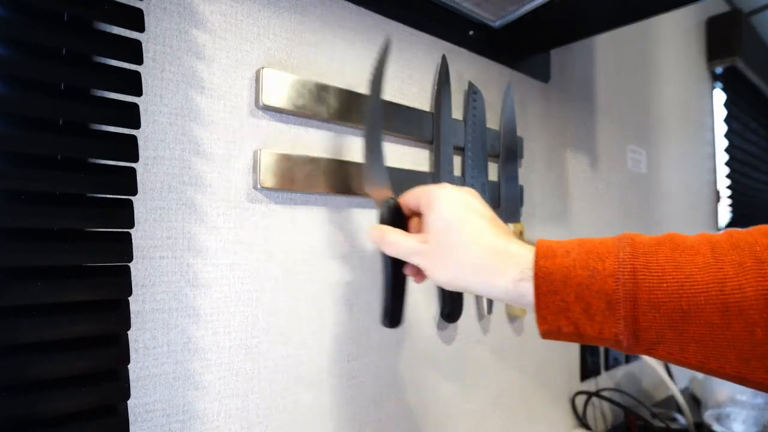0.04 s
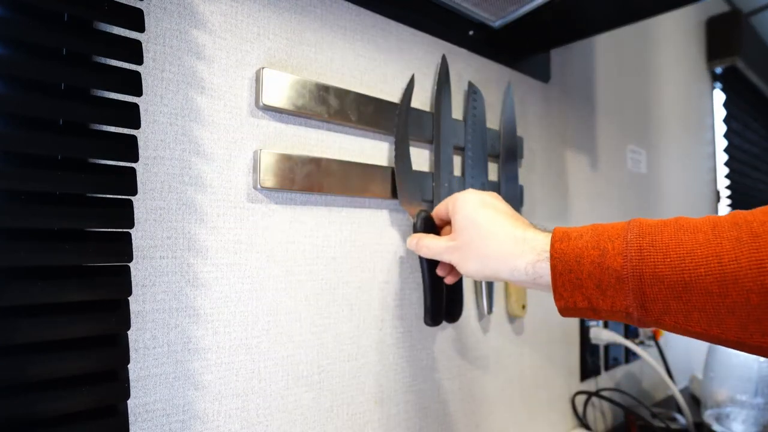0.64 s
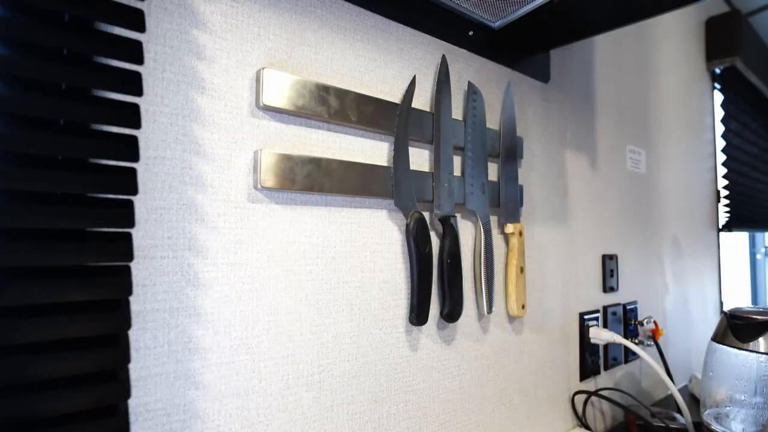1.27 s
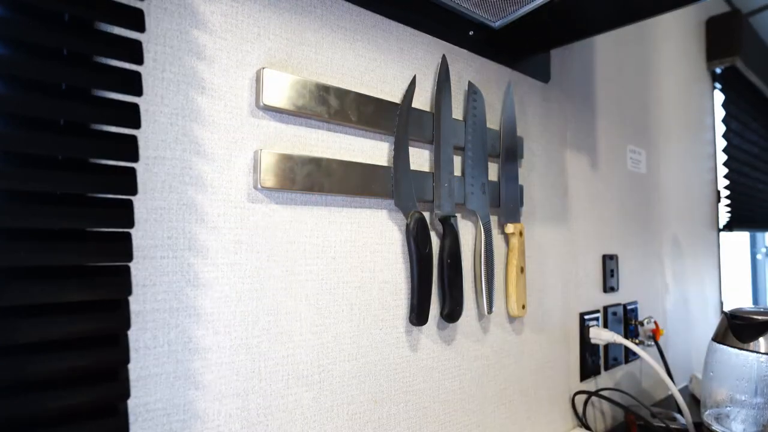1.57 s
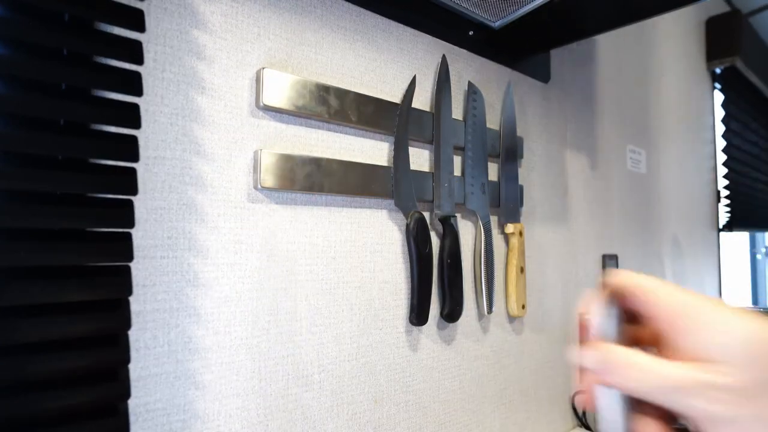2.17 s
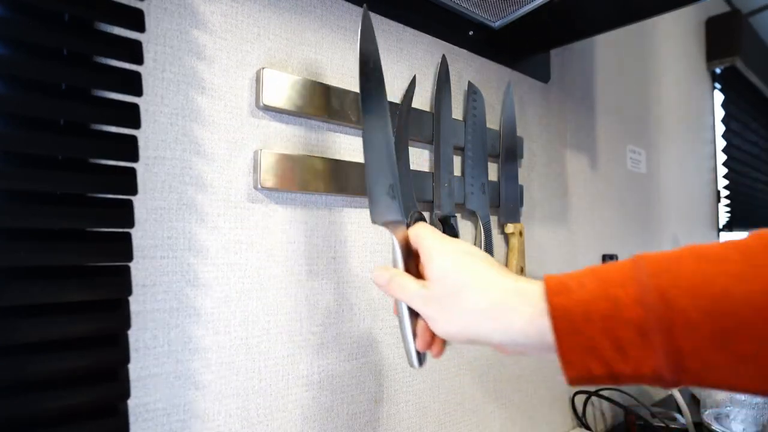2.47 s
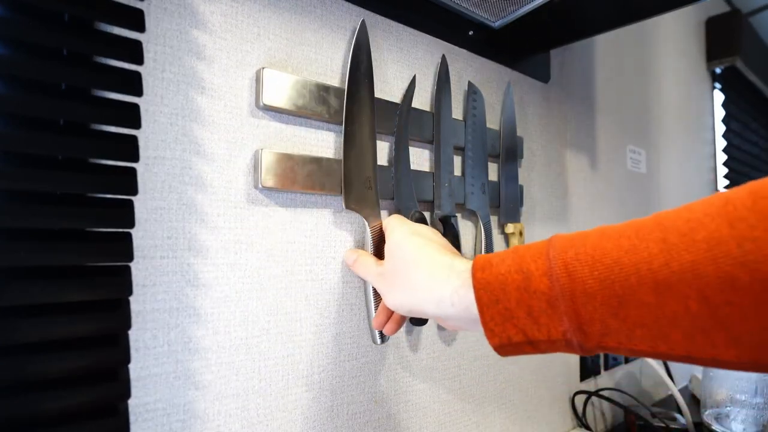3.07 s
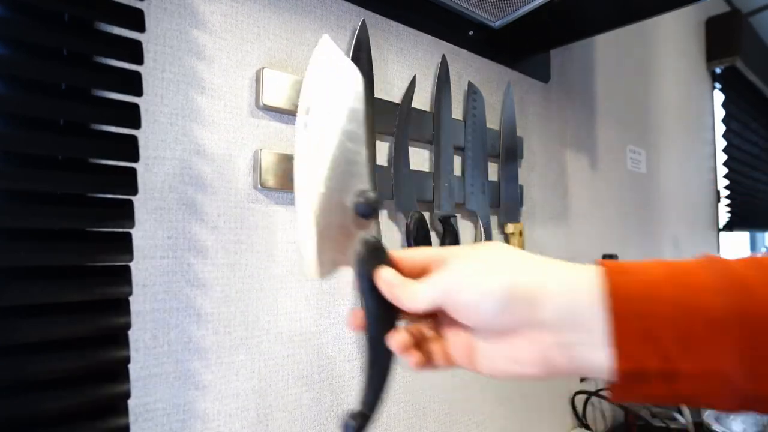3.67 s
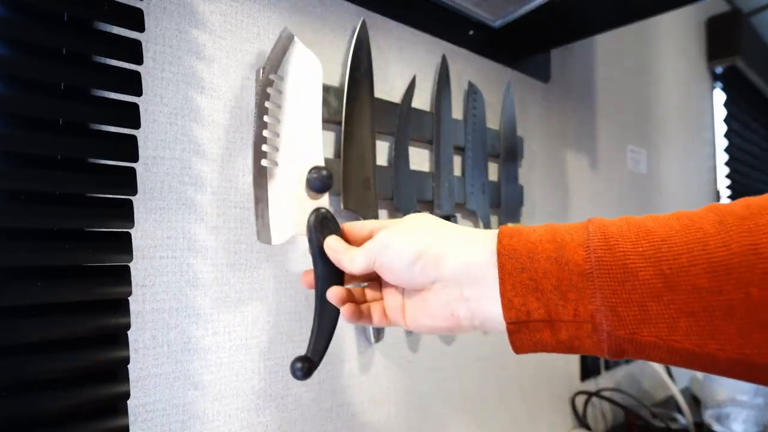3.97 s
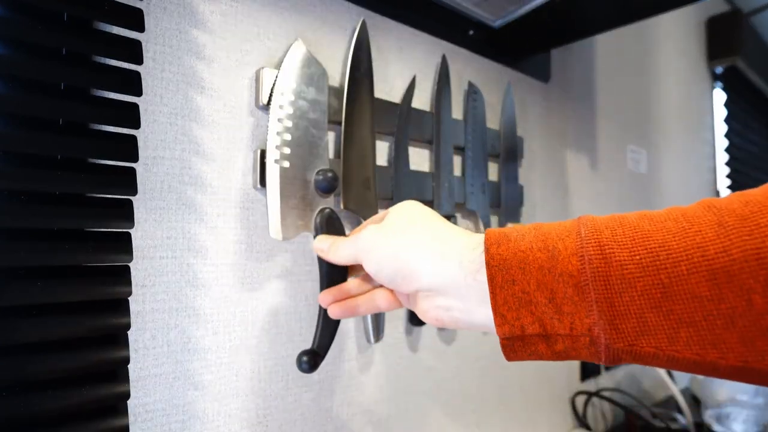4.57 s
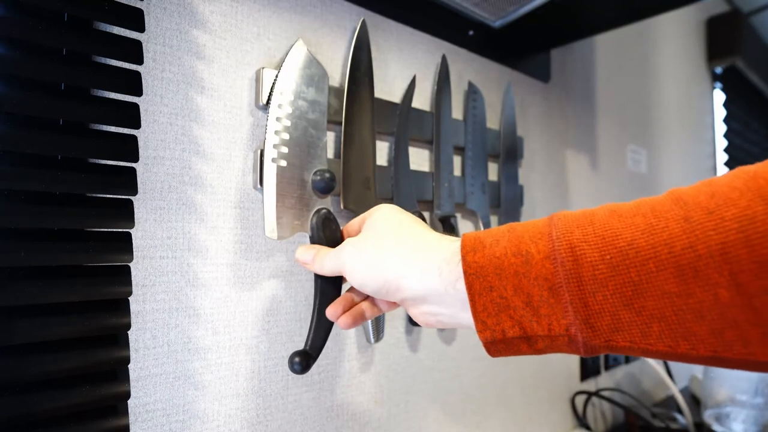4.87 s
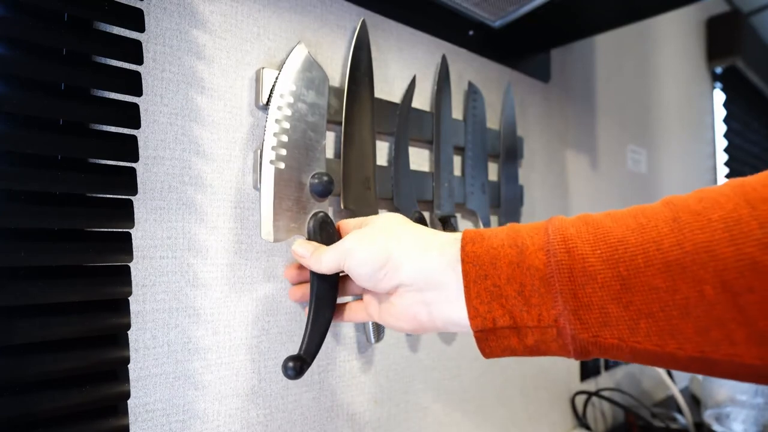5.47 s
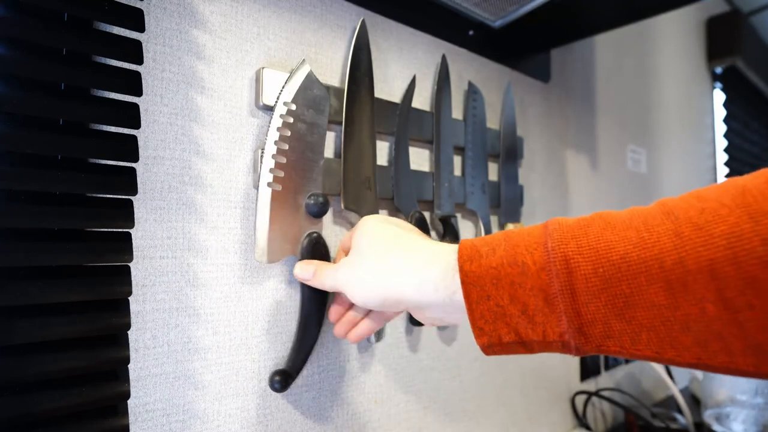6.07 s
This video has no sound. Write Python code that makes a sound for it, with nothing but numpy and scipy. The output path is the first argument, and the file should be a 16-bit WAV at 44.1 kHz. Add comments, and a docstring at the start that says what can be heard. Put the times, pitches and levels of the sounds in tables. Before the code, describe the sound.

A thin knife snaps onto a magnetic steel bar with a sharp, ringing click, and its handle knocks the hollow wall. A chef's knife follows, its handle bouncing, then a cleaver lands with a heavier clack and thump. Near the end the cleaver scrapes softly along the bar and snaps on again, its handle knocking and bouncing. The sounds are close, in a small room with faint ventilation.

```python
"""Ventilation murmurs in a small room while three kitchen knives are put on a magnetic steel bar.
First comes a boning knife, then a chef's knife, then a cleaver. Each blade snaps on and rings until it
lies flat; then its handle knocks the hollow wall. Settling steel ticks, and the second handle bounces.
Near the end the cleaver scrapes along the bar and snaps on again, and its handle bounces too."""
import sys
import numpy as np
from scipy import signal
from scipy.fft import irfft
from scipy.io import wavfile
from scipy.ndimage import map_coordinates

SR = 44100
rng = np.random.default_rng(int(sys.argv[2]) if len(sys.argv) > 2 else 0)


def dump(signal):
    """Clip the signal to [-1, 1] and save it as 16-bit WAV at the path in sys.argv[1]."""
    limited = np.clip(np.atleast_2d(signal).T, -1, 1)
    pcm = np.round(limited * 32767).astype(np.int16)
    wavfile.write(sys.argv[1], SR, pcm)


N = 279053
CLOCK = np.arange(N) / SR  # seconds since the start
AGE = np.arange(SR // 2) / SR  # seconds since a contact

# the tones of the hollow wall: f/Hz, level/dB, t60/s (the time to fade by 60 dB)
WALL_TONES = [(75.6, -25, .2), (132, -17, 0.14), (266, -4.5, 0.072), (328.3, 3, 0.042), (368, -11.5, 0.02),
              (466, -17, 0.026), (760.5, -7.5, 0.07), (962, -14.5, 0.077)]


def amp(db):
    """Turn decibels into a factor to multiply by."""
    return 10 ** (np.asarray(db) / 20)


def unit(x):
    """Scale a signal to an average strength (rms) of 1."""
    return x / np.sqrt(np.mean(x ** 2) + 1e-20)


def along(points, hz):
    """Read between (frequency, value) points, giving each octave equal space."""
    freqs, values = np.transpose(points)
    return np.interp(np.log(hz + 1), np.log(freqs + 1), values)


def wobble(rate):
    """A smooth curve through `rate` random values a second."""
    return map_coordinates(rng.standard_normal(int(N * rate / SR) + 4), [CLOCK * rate])


def fade(t60, hold=0):
    """Stay level for `hold` seconds, then fall 60 dB every t60 seconds."""
    return np.exp(-np.log(1000) * np.maximum(AGE - hold, 0) / t60)


def noise(colour, size=len(AGE), tilt=None):
    """Noise of strength 1 with a colour, then turned up or down by a tilt; both list f/Hz, level/dB."""
    hz = np.fft.rfftfreq(size, 1 / SR)
    bins = unit(amp(along(colour, hz))) * np.exp(2j * np.pi * rng.random(len(hz)))
    return irfft(bins * amp(along(tilt, hz) if tilt else 0), size) * np.sqrt(size)


def ring(tones, scatter_db, attack):
    """A struck object rings with its own fading tones; each blow mixes them a little differently."""
    hz, db, t60 = np.transpose(tones)
    gains = amp(db + scatter_db * rng.standard_normal(len(hz))) / np.linalg.norm(amp(db))
    waves = np.sin(2 * np.pi * hz[:, None] * AGE) * fade(t60[:, None])
    return gains @ waves * (1 - np.exp(-AGE / attack))


def room(x, echo_db):
    """Close walls answer a sound with a quick, dense echo."""
    # how long the echo lasts: f/Hz, t60/s
    echo_times = [(100, .3), (300, 0.18), (800, 0.24), (2000, 0.15), (5000, 0.22), (14000, .15)]
    hz, t, bands = signal.stft(rng.standard_normal(len(AGE)), SR, nperseg=256)
    decay = np.exp(-np.log(1000) * t / along(echo_times, hz)[:, None])
    tail = signal.istft(bands * decay, SR, nperseg=256)[1][:len(AGE)]
    tail *= np.clip(AGE / .008, 0, 1) ** 2  # the echo takes a moment to build
    return x + amp(echo_db) * signal.fftconvolve(x, tail / np.linalg.norm(tail))[:len(x)]


def add(track, t, sound):
    """Mix a sound into the track at t seconds."""
    part = track[round(t * SR):][:len(sound)]
    part += sound[:len(part)]


def background():
    """Over a low rumble, the background murmur and hiss swell once, sag slowly and sink back."""
    # the colours of the three noises: f/Hz, level/dB
    rumble_colour = [(15, -37.5), (31, -20.5), (42, 3), (56, -0.5), (90, -3), (125, -7), (206, -11.5),
                     (400, -19.5), (600, -48.5)]
    murmur_colour = [(180, -41), (300, -10), (403, -11), (487, 1), (532, -3), (775, -4.5), (881, 2.5),
                     (1040, -5.5), (1280, -10), (1380, -26.5), (1500, -11), (1950, -36), (3300, -120)]
    hiss_colour = [(760, -48), (1300, 1), (1380, -4.5), (1920, -6), (2660, -2), (3110, -9.5), (4540, -15.5),
                   (5540, -22), (15000, -31.5), (16000, -38)]
    start_s, rise_s, end_s, fall_s, sag_per_s = 0.66, 0.89, 4.86, 0.37, .11
    rise = np.clip((CLOCK - start_s) / rise_s, 0, 1)
    fall = np.clip((CLOCK - end_s) / fall_s, 0, 1)
    swell = rise * (1 - fall) * (1 - sag_per_s * (CLOCK - start_s))
    rumble = amp(-48 + 1.2 * wobble(5.8)) * noise(rumble_colour, size=N)
    murmur = amp(-55.5 + 6.5 * swell + 0.6 * wobble(3.9)) * noise(murmur_colour, size=N)
    hiss = amp(-61.5 + 8.5 * swell) * noise(hiss_colour, size=N)
    return rumble + murmur + hiss


def blades():
    """The magnet pulls a blade in: it chatters on the bar, rings, and shakes the wall behind."""
    # a blade meets the bar: t/s, knife (0-2), clack/dB, chatter t60/s, treble/dB, ring/dB,
    # wall thump/dB, main ping/Hz, second ping/Hz, ping/dB
    snaps = [(0.5147, 0, -12, 0.061, 3.5, -8.5, -43, 1840, 392, -11.5),
             (0.702, 0, -27, 0.041, -2.5, -42, -32, 1566, 2362, -23),
             (2.862, 1, -8, 0.079, 3.5, -11, -32.5, 999, 1970, -16),
             (2.9761, 1, -8.5, 0.015, -9, -59, -42, 2095, 2394, -12),
             (4.0653, 2, -5.5, 0.018, -0.5, -17, -3, 2696, 2130, -10.5),
             (4.2603, 2, -22.5, 0.022, -24, -53, -23, 1996, 1490, -19.5),
             (6.0704, 2, -5.5, 0.021, 3.5, -32, -6.5, 2040, 1190, -12)]
    # the tones each blade rings with: f/Hz, level/dB, t60/s
    boning_tones = [(279.5, -1, 0.24), (1018.6, -6.5, 0.19), (1855, -6, 0.17), (1983, -5, 0.15),
                    (2650, -13, 0.22), (2905, 4, 0.097), (3520, -8, 0.16), (3820, -27, 0.26),
                    (4800, -15, 0.1), (6514, -13.5, 0.087), (8100, -11, 0.15), (9400, -19, 0.13),
                    (11080, -33, 0.16), (13000, -15.5, 0.083)]
    chef_tones = [(242, -5, .14), (991, -4, .15), (1265, -11, .14), (2229, -19, .35), (3385, 0, .09),
                  (3892, -21, .26), (4059, -21, .33), (4339, -5, 1.05), (5235, -4, .12), (6401, -13, .15),
                  (8107, -18, .16), (8760, -14, .14), (9141, 2.5, .17), (9660, -2, .07)]
    cleaver_tones = [(797, -3, 0.15), (964, 0, 0.17), (1267, -1, .14), (1475, -1.5, 0.15),
                     (2067, -6.5, 0.14), (2270, -6, .16), (2780, -4, .18), (3219, -14, .17),
                     (3560, -14, 0.16), (3935, -3, 0.16), (5744, -9, 0.079), (8480, -6, 0.17),
                     (10490, -15, 0.11), (14650, -12.5, .11)]
    # the colour of each blade's clack: f/Hz, level/dB
    boning_clack = [(59, -39), (100, -16), (818, -3), (1360, -10), (1870, -6), (2320, -15.5), (2860, -3),
                    (3190, -22), (3620, -5), (4470, -18), (12700, -21.5), (16000, -36)]
    chef_clack = [(59, -35.5), (100, -9), (424, -1.5), (676, -4), (1030, -0.5), (1580, -12), (1910, 2.5),
                  (2080, -3.5), (3400, -7.5), (4570, -13.5), (9410, -19), (16000, -21.5)]
    cleaver_clack = [(80, -22), (290, 10), (480, 1.5), (1000, -7.5), (1450, 0), (1700, -2), (2050, 6.5),
                     (2700, -4.5), (3500, -11), (5000, -10), (8500, -15.5), (16000, -24)]
    knives = [(boning_tones, boning_clack), (chef_tones, chef_clack), (cleaver_tones, cleaver_clack)]
    next_times = [snap[0] for snap in snaps[1:]] + [N / SR]
    out = np.zeros(N)
    for snap, next_t in zip(snaps, next_times):
        t, knife, clack_db, chatter_s, treble_db, ring_db, thump_db, main_hz, second_hz, ping_db = snap
        tones, colour = knives[round(knife)]
        # a flatter, softer contact has less treble
        clack = noise(colour, tilt=[(2800, 0.0016), (4500, treble_db)]) * fade(chatter_s, hold=0.0034)
        # the point of contact picks two short, strong pitches
        ping = np.sin(2 * np.pi * main_hz * AGE) + amp(-4) * np.sin(2 * np.pi * second_hz * AGE)
        ping *= fade(chatter_s + 0.013) * (1 - np.exp(-AGE / 0.00061))
        # lying flat on the bar at the next contact chokes most of the ring
        choke = fade(.03, hold=next_t - t) + amp(-32.5)
        steel = amp(ring_db) * ring(tones, scatter_db=2.5, attack=0.003) * choke
        thump = amp(thump_db) * ring(WALL_TONES, scatter_db=-2.5, attack=0.00067)
        # the very first touch of steel on steel is a bright crack
        crack = noise([(2500, -34), (5000, -8.5), (10000, -0.5), (16000, -3.5)])
        crack *= amp(treble_db - 13) * fade(0.012, hold=0.0022)
        contact = amp(clack_db) * (clack + crack) + amp(ping_db) * ping
        add(out, t, room(contact, echo_db=-9.5) + steel + room(thump, echo_db=-8))
    return out


def ticks():
    """Blades settle on the bar with tiny ticks."""
    # light touches of steel on steel: t/s, level/dB, body/dB (the lower part of the sound)
    touches = [(0.8323, -30.5, 1), (1.1443, -29.5, -13.5), (1.224, -42, -11), (1.2848, -39, 7),
               (5.088, -35.5, 1.5), (5.17, -39.5, -4)]
    # the colour of a tick: f/Hz, level/dB
    tick_colour = [(300, 8), (900, 3.5), (1700, 3), (3500, -5), (5500, -15.5), (10000, -18), (16000, -26)]
    out = np.zeros(N)
    for t, db, body_db in touches:
        tick = noise(tick_colour, tilt=[(2000, body_db - 0.5), (4500, 0)]) * fade(0.03, hold=0.0015)
        add(out, t, amp(db - 1) * room(tick, echo_db=-4.5))
    return out


def knock(db, clack_db, bass_db):
    """One blow of a handle makes a thud and sets the hollow wall ringing."""
    # the colour of the thud: f/Hz, level/dB
    thud_colour = [(20, -30), (45, -19), (110, 4), (200, -7.5), (320, 7), (550, 1.5), (800, 3.5),
                   (1300, -2.5), (2300, -11), (4000, -22.5), (8000, -35.5), (16000, -45)]
    tilt = [(120, bass_db), (400, 0), (1200, clack_db + 2), (2200, clack_db + 6.5), (6000, -4)]
    thud = noise(thud_colour, tilt=tilt) * fade(0.05, hold=0.0022) * (1 - np.exp(-AGE / 0.00013))
    wall = ring(WALL_TONES, scatter_db=0.5, attack=0.00078)
    return amp(db) * room(amp(-6) * thud - amp(-0.5) * wall, echo_db=-8.5)


def handles():
    """Handles swing against the wall; one that is let go hits four times, each sooner and weaker."""
    # a held handle knocks once: t/s, level/dB, clack/dB, bass/dB
    single_knocks = [(0.8542, -2, -3, -10), (3.257, -27.5, -13, -5), (3.2985, -13.5, -14, 8.5),
                     (4.359, -21.5, -7, 13), (5.186, -28.5, -20, -6), (5.9032, -23.5, -6.5, -5),
                     (6.032, -34.5, -6, 0), (6.108, -1.5, -8.5, 7)]
    # a handle let go bounces: t/s, level/dB, clack/dB, first gap/s, loss per bounce/dB
    bounces = [(2.9789, -11.5, -3.5, .0305, 3), (6.1539, -9.5, 0, .041, 10.5)]
    gap_shrink, rebound_clack_db = 0.96, -6
    out = np.zeros(N)
    for t, db, clack_db, bass_db in single_knocks:
        add(out, t, knock(db, clack_db, bass_db))
    for t, db, clack_db, gap_s, loss_db in bounces:
        for k in range(4):
            add(out, t, knock(db - k * loss_db, clack_db + rebound_clack_db * (k > 0), bass_db=0.5))
            t += gap_s * gap_shrink ** k
    return out


def slide():
    """Steel drags over steel in short strokes: tiny uneven slips hiss and set the cleaver singing."""
    # pushes along the bar: middle t/s, length/s, level/dB
    strokes = [(5.225, 0.16, -57.5), (5.509, 0.099, -44), (5.842, 0.1, -39.5), (6.061, 0.12, -42)]
    # the colour of the scraping: f/Hz, level/dB
    scrape_colour = [(150, -23), (330, 7.5), (600, 0.5), (1200, 0), (1950, 1.5), (2900, -5.5),
                     (4500, -11.5), (7000, -18.5), (9500, -16), (13500, -24.5), (16000, -33.5)]
    # the cleaver's tones while it is pressed on the bar: f/Hz, level/dB, t60/s
    pressed_tones = [(1950, 0, .012), (2520, -2, .011), (3470, -9, .014), (3930, -11, .014),
                     (5140, -12, .016), (8700, -9, .008), (9530, -7, .008), (9820, -9, .016),
                     (11100, -12, .012), (12700, -7, .012), (14100, -7, .016), (15200, -8, .013)]
    ends_db = -9.5  # a stroke is this much quieter at its ends than in its middle
    slips_per_s, slip_spread_db, singing_db = 1500, 3, -7
    loudness = sum(amp(db + ends_db * (2 * (CLOCK - t) / length) ** 2) for t, length, db in strokes)
    slips = unit(noise(scrape_colour, size=N) * amp(slip_spread_db * wobble(slips_per_s)))
    blade_ring = ring(pressed_tones, scatter_db=-1, attack=0.0013)
    # rubbing drives the high tones hardest; taking the slope (gradient) favours them
    singing = signal.fftconvolve(np.gradient(slips), blade_ring)[:N]
    return loudness * unit(slips + amp(singing_db) * unit(singing))


def scene():
    """All the sounds together, heard close up on one channel."""
    return (background() + blades() + ticks() + handles() + slide())[None]


def record(dry):
    """The loudest peaks are rounded off, and the treble is cut steeply above 16000 Hz."""
    rounded = dry / (1 + np.abs(dry / .98) ** 4) ** (1 / 4)
    low_pass = signal.firwin(161, 16000, fs=SR)
    return signal.fftconvolve(rounded, low_pass[None], mode="same")


dry = scene()
out = record(dry)
dump(out)
```